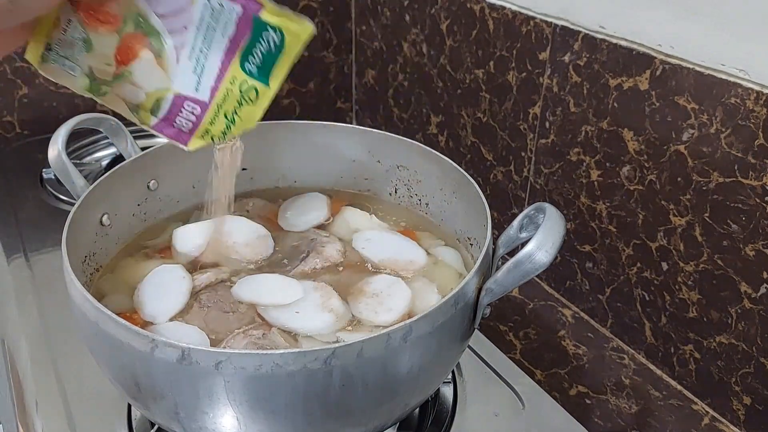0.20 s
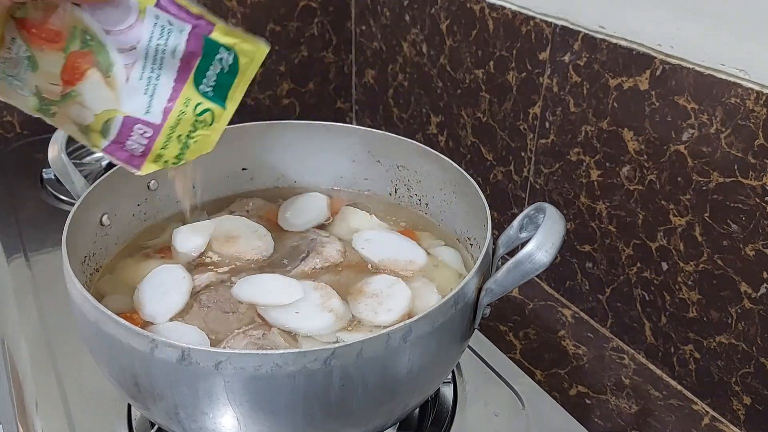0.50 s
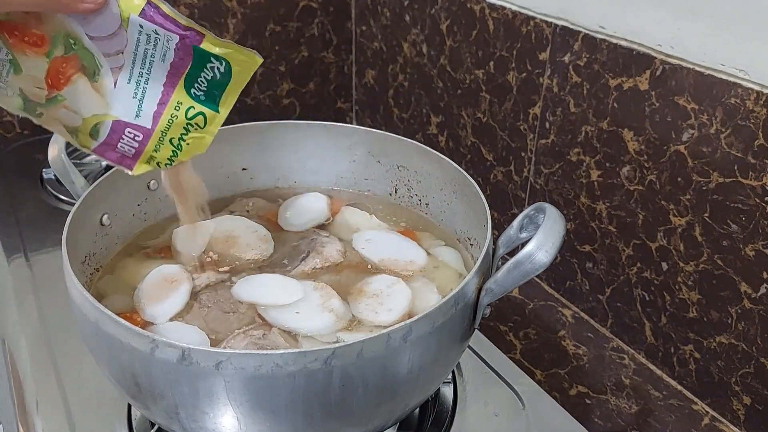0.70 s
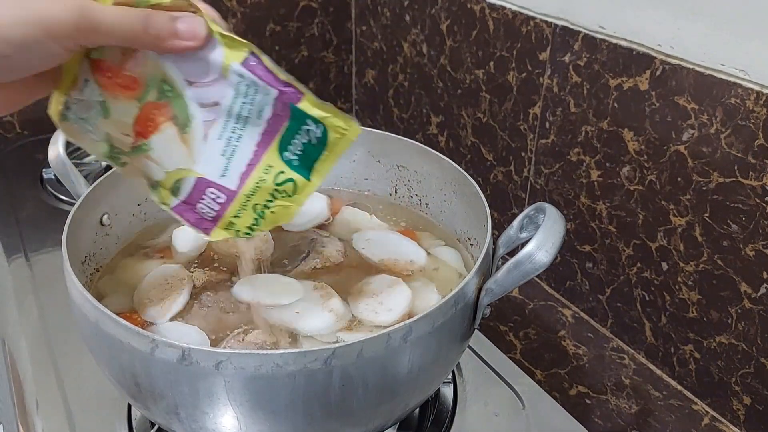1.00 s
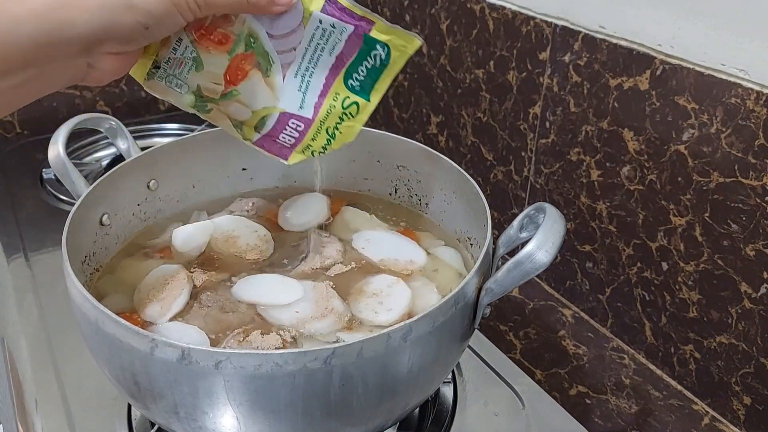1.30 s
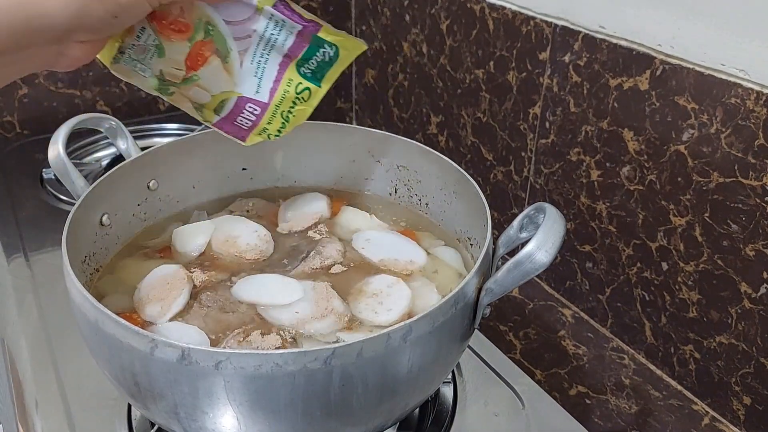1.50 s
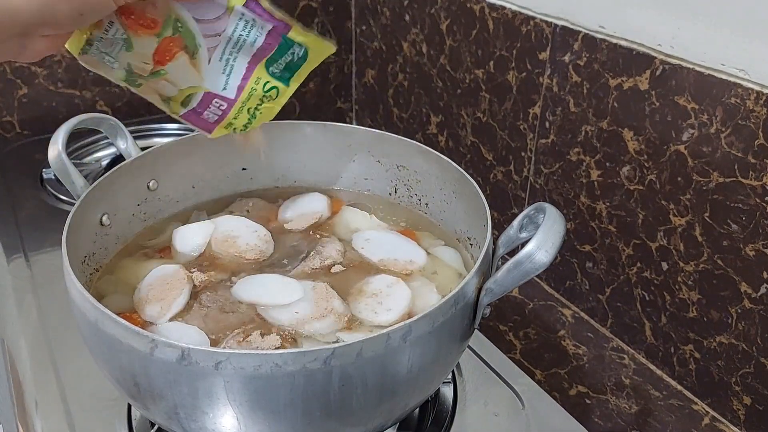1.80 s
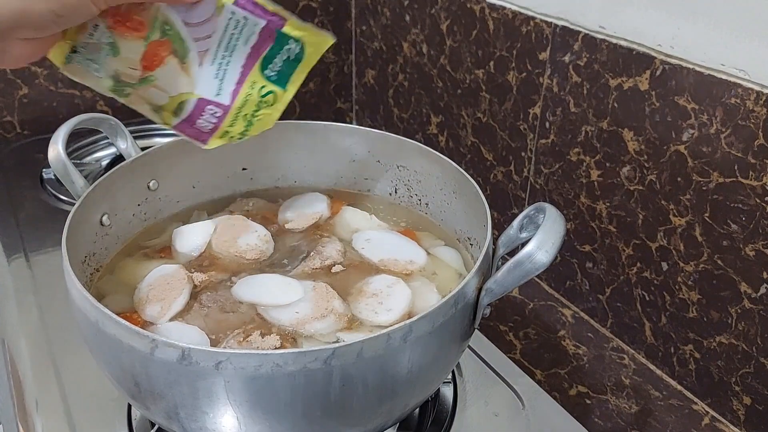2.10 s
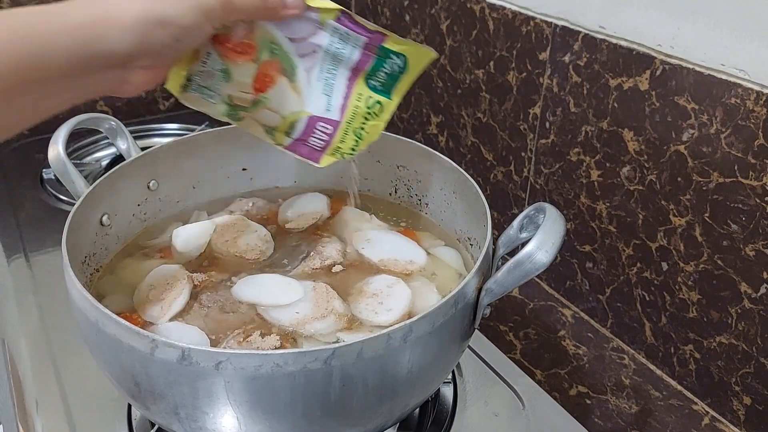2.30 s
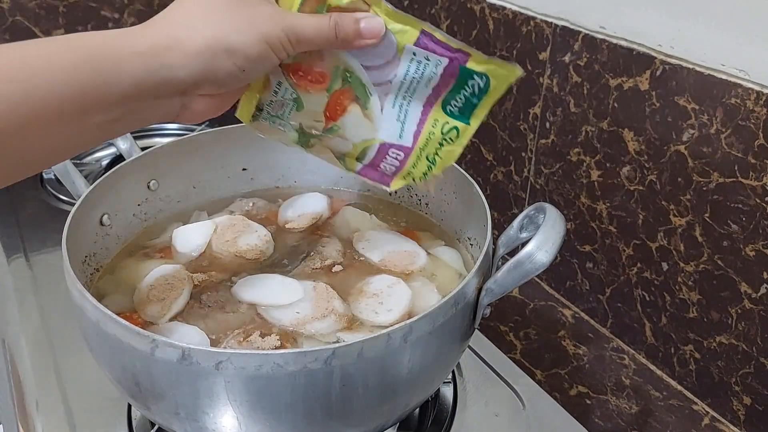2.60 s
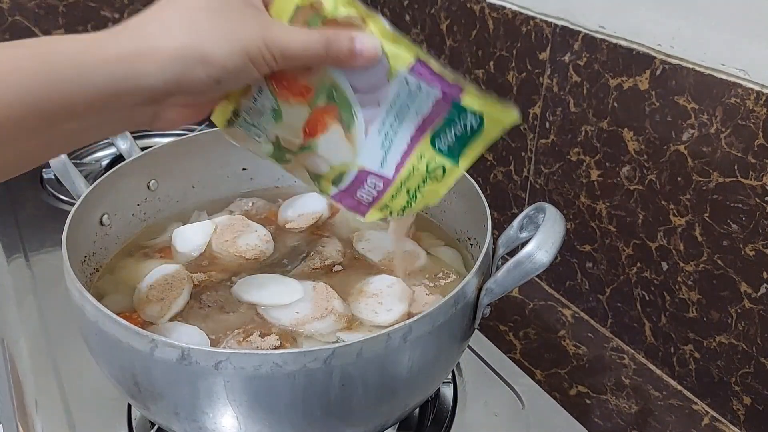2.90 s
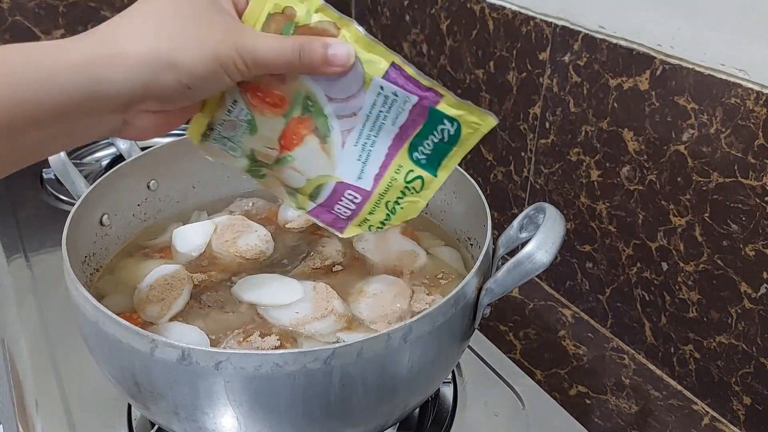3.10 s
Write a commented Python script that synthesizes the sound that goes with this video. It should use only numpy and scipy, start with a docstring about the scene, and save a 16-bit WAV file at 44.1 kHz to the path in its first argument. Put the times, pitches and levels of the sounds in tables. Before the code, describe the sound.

Crisp foil pouch shaken repeatedly, with sharp crackly clicks and powdery hiss, close in a quiet tiled room

```python
"""In a small tiled kitchen, a foil sachet of seasoning powder is shaken over a pot.
Each shake is a swell of random crinkles and powder hiss; creases snap over as a click with a bright chatter.
Now and then the hollow pouch booms on an unsteady low sine, or powder slumps as noise through low resonances.
All but the booms get quick echoes and a short noise tail; faint hiss and a low hum fill the still room."""
import sys
import numpy as np
from scipy import signal
from scipy.fft import rfft, irfft
from scipy.io import wavfile
from scipy.ndimage import uniform_filter1d

SR = 44100
rng = np.random.default_rng(int(sys.argv[2]) if len(sys.argv) > 2 else 0)


def put_to_file(sound):
    """Save the sound as 16-bit audio at rate SR, in the file named by the first command-line argument."""
    columns = np.atleast_2d(sound).T  # one column per channel
    safe = np.clip(columns, -1, 1)
    whole_steps = np.round(safe * 32767)
    wavfile.write(sys.argv[1], SR, whole_steps.astype(np.int16))


N = 141120  # samples in the scene
SIZE = 16384  # samples in one event, filter or echo path

AIR_DB, HUM_DB, HUM_RIGHT_DB = -71.5, -70.5, -13  # the last is the hum on the right relative to the left
HUM_HZ, HUM_WIDTH_HZ = 123.7, 23

# Echoes and tail are set against the direct sound; the three are then scaled down together.
NEAR_WALL_DB, RUSTLE_ROOM_DB, SNAP_ROOM_DB, SLUMP_ROOM_DB = 2.5, 6.5, -2, -4.5
NEAR_WALL_S, TAIL_BUILD_S, PATH_CHANGE_S = 0.0034, 0.002, 0.005

SLUMP_RISE_S, SLUMP_FALL_S = 0.0037, 0.019

LEAD_S = 0.1  # time kept ahead of a crest for its rise
BOOM_RISE_S, BOOM_FALL_S = 0.018, 0.047
BOOM_WAVER = 0.038  # rms pitch wander as a fraction of the pitch
BOOM_DB, BOOM_RIGHT_DB = 2.5, -4  # gain of all booms, right relative to left

BODY_HZ, TOP_HZ = 1770, 8400  # edges of the foil's low and high shelves
FOLD_RIPPLE_DB = 1.72  # rms

SNAP_DB, USUAL_BODY_DB = 12, -17.5  # gain of all snaps, body level that leaves the snap curve as it is
CHATTER_SHARE = 1.36  # chatter amplitude against a click of 1
RING_DB, RING_WIDTH_HZ = 8, 490

GRAINS_PER_S, GRAIN_SPREAD_DB = 2200, 4.5
POWDER_SHARE = 0.41  # part of the power that is powder hiss
CLUMP_DB, RUSTLE_DB = 2.06, 1.5  # rms depth of the clumping, gain of all shakes
SWISH_DB, SWISH_WIDTH_HZ = 2.5, 830

EDGE_HZ = 16000


def amp(db):
    """Decibels to gain."""
    return 10 ** (np.asarray(db) / 20)


def evened(x):
    """Scales to rms 1."""
    return x / np.sqrt(np.mean(x ** 2) + 1e-20)


def unit(x):
    """Scales each channel to energy 1."""
    return x / np.sqrt(np.sum(x ** 2, -1, keepdims=True) + 1e-20)


def read(points, hz):
    """Reads a table on a log-frequency axis."""
    f, value = np.transpose(points)
    return np.interp(np.log(hz + 1), np.log(f + 1), value)


def swell(t, rise, fall):
    """Bell-shaped rise to a crest at t = 0, then an exponential fall."""
    return np.exp(np.where(t < 0, -0.5 * (t / rise) ** 2, -abs(t) / fall))


def coloured(x, gain_db):
    """Minimum-phase filter with the given gain in each frequency bin, so nothing sounds early."""
    cepstrum = irfft(gain_db * np.log(10) / 20)
    # Folding the cepstrum onto positive times makes the filter causal.
    cepstrum[1:SIZE // 2] *= 2
    cepstrum[SIZE // 2 + 1:] = 0
    return irfft(rfft(x) * np.exp(rfft(cepstrum)))


def add(mix, s, sound):
    """Mixes a stereo sound in at time s."""
    at = round(s * SR)
    sound = sound[:, max(-at, 0):]
    part = mix[:, max(at, 0):][:, :sound.shape[1]]
    part += sound[:, :part.shape[1]]


def played(source, rows):
    """One stereo track from a table of events."""
    mix = np.zeros((2, N))
    for row in rows:
        add(mix, *source(*row))
    return mix


def placed(s, sound):
    """Delays the right side, as the sound reaches the left microphone first."""
    # Position of the pouch. Each row: time in seconds, lead of the left side in seconds.
    left_lead = [(0, .00023), (1.2, .00015), (3.2, .00008)]
    lag = round(np.interp(s, *np.transpose(left_lead)) * SR)
    return s, np.array([sound, np.pad(sound, (lag, 0))[:SIZE]])


def still_room():
    """Faint stereo hiss, and a low hum of narrow-band noise that wavers by itself."""
    # Tone of the hiss. Each row: frequency in Hz, relative gain in dB.
    air_tone = [(15, -50), (25, -31), (38, -9.5), (92, -8.5), (120, -27.5), (223, -12), (270, -9),
                (439, -25.5), (3620, -32.5), (10700, -26), (16000, -28)]
    hz = np.fft.rfftfreq(N, 1 / SR)
    left, right, low = rfft(rng.standard_normal((3, N)))
    air = evened(irfft(np.array([left, right]) * amp(read(air_tone, hz)), N))
    hum = evened(irfft(low / (1 + ((hz - HUM_HZ) / HUM_WIDTH_HZ) ** 2), N))
    return amp(AIR_DB) * air + amp(HUM_DB) * hum * amp([[0], [HUM_RIGHT_DB]])


def kitchen(x, room_db, count=8):
    """Direct sound, quick echoes off pot and tiles, and a diffuse tail; paths keep changing as the foil moves."""
    # Reverberation of the hard room. Each row: frequency in Hz, time to fall by 60 dB in seconds.
    decay = [(100, 0.28), (250, 0.34), (700, 0.27), (1800, 0.28), (5000, 0.26), (12000, 0.21),
             (16000, 0.26)]
    # Stereo lean. Each row: frequency in Hz, gain of left over right in dB.
    lean_curve = [(60, 7), (250, 9.5), (450, 2.5), (750, -1), (1500, 2), (3300, -0.5), (5500, -2),
                  (9000, -1), (15000, 0)]
    t, out = np.arange(SIZE) / SR, x.copy()
    turn = np.arange(N) / SR / PATH_CHANGE_S
    for k in range(count):
        near, late = rng.standard_normal((2, 2, SIZE))
        # Sparse echoes, none in the first 20 samples.
        sparse = rng.random((2, SIZE)) < 0.2
        near = unit(near * sparse * np.exp(-t / NEAR_WALL_S) * (np.arange(SIZE) > 20))
        # The tail is noise that dies at its own rate in each band.
        hz, when, bands = signal.stft(late, SR, nperseg=256)
        bands = bands * amp(-60 * when / read(decay, hz)[:, None])
        late = signal.istft(bands, SR, nperseg=256)[1][:, :SIZE]
        tail = unit(late * (1 - np.exp(-t / TAIL_BUILD_S)))
        paths = amp(NEAR_WALL_DB) * near + amp(room_db) * tail
        # The sets of paths crossfade in turn, each fading in and out over two steps.
        share = np.sin(np.pi / 2 * np.minimum((turn - k) % count, 2))
        out += signal.oaconvolve((x[0] * share)[None], paths, axes=1)[:, :N]
    lean = read(lean_curve, np.fft.rfftfreq(N, 1 / SR)) / 2
    leaning = irfft(rfft(out) * amp([lean, -lean]), N)
    return leaning / np.sqrt(1 + amp(NEAR_WALL_DB) ** 2 + amp(room_db) ** 2)


def slump(start, level_db):
    """Powder slumps against the pouch wall: a soft, dull push of noise through low resonances."""
    # Low resonances of pouch and pot. Each row: frequency in Hz, half-width in Hz, relative gain in dB.
    hollow = [(370, 32, -2.5), (555, 26, 2), (640, 54, -8), (774, 45, -5), (846, 45, -4)]
    t, hz = np.arange(SIZE) / SR, np.fft.rfftfreq(SIZE, 1 / SR)
    shape = sum(amp(db) / (1 + ((hz - f) / width) ** 2) for f, width, db in hollow)
    body = evened(irfft(rfft(rng.standard_normal(SIZE)) * shape))
    push = (1 - np.exp(-t / SLUMP_RISE_S)) * np.exp(-t / SLUMP_FALL_S)
    return placed(start, amp(level_db) * body * push)


def boom(crest, level_db, pitch_hz):
    """The air in the open pouch sounds one short, unsteady low note."""
    t = np.arange(SIZE) / SR - LEAD_S
    waver = evened(uniform_filter1d(rng.standard_normal(SIZE), size=400))
    phase = 2 * np.pi * np.cumsum(pitch_hz * (1 + BOOM_WAVER * waver)) / SR
    tone = swell(t, BOOM_RISE_S, BOOM_FALL_S) * np.sin(phase)
    return crest - LEAD_S, amp(level_db + BOOM_DB) * tone * amp([[0], [BOOM_RIGHT_DB]])


def foil(points, body_db, top_db, ring_hz, ring_width_hz, ring_db):
    """Colour of the foil in one pose: base curve, two shelves, one ringing facet and the ripple of its folds."""
    hz = np.fft.rfftfreq(SIZE, 1 / SR)
    rough = rng.standard_normal(len(hz))
    ripple = evened(uniform_filter1d(uniform_filter1d(rough, size=170), size=90))
    body = 1 / (1 + (hz / BODY_HZ) ** 4)
    top = 1 - 1 / (1 + (hz / TOP_HZ) ** 4)
    ring = 1 / (1 + ((hz - ring_hz) / ring_width_hz) ** 2)
    shelves = body_db * body + top_db * top
    return read(points, hz) + shelves + ring_db * ring + FOLD_RIPPLE_DB * ripple


def snap(start, level_db, body_db, ring_hz, chatter_s):
    """A crease flips with a click, chatters brightly for a moment and rings its own facet of foil."""
    # Base tone of a snap. Each row: frequency in Hz, gain in dB.
    crack_tone = [(30, -43), (150, -23), (250, -13.5), (500, -9), (900, 2), (1400, 0), (2200, 3.5),
                  (3200, 6), (4800, 5), (6000, 3.5), (7200, 4.5), (8600, 0), (10200, 4.5), (12000, 5.5),
                  (14000, -1), (16000, 0)]
    t = np.arange(SIZE) / SR
    # Differenced noise is bright; a little plain noise fills in below it.
    chatter = np.diff(rng.standard_normal(SIZE + 1)) + rng.standard_normal(SIZE) * 0.5
    click = CHATTER_SHARE * unit(chatter * np.exp(-t / chatter_s))
    click[0] = 1
    colour = foil(crack_tone, body_db - USUAL_BODY_DB, 0, ring_hz, RING_WIDTH_HZ, RING_DB)
    return placed(start, amp(level_db + SNAP_DB) * coloured(unit(click), colour))


def shake(crest, rise, fall, level_db, body_db, top_db, ring_hz):
    """A swarm of tiny crinkles over the hiss of sliding powder swells and dies."""
    # Base tone of the rustle. Each row: frequency in Hz, gain in dB.
    rustle_tone = [(30, -22), (120, -7.5), (175, -28), (250, -1), (400, -4.5), (560, -0.5), (720, 1),
                   (950, 3.5), (1250, 0.5), (2000, 5), (3300, 2.5), (4900, 5), (6000, 1), (7200, 4.5),
                   (8500, -2.5), (10000, 1.5), (11800, 6), (14000, 0), (16000, -6.5)]
    t = np.arange(SIZE) / SR - LEAD_S
    sizes = amp(GRAIN_SPREAD_DB * np.minimum(rng.exponential(1, SIZE), 4))
    sizes = sizes * rng.choice([-1, 1], SIZE)
    crinkles = evened(sizes * (rng.random(SIZE) < GRAINS_PER_S / SR))
    powder = rng.standard_normal(SIZE)
    drive = np.sqrt(1 - POWDER_SHARE) * crinkles + np.sqrt(POWDER_SHARE) * powder
    # Crinkles and hiss come in clumps a few milliseconds long.
    clumps = amp(CLUMP_DB * evened(uniform_filter1d(rng.standard_normal(SIZE), size=90)))
    rustle = evened(drive * clumps) * swell(t, rise, fall)
    colour = foil(rustle_tone, body_db, top_db, ring_hz, SWISH_WIDTH_HZ, SWISH_DB)
    return placed(crest - LEAD_S, amp(level_db + RUSTLE_DB) * coloured(rustle, colour))


def scene():
    """Shakes, snaps, booms and slumping powder over the quiet kitchen."""
    # Powder slumping against the pouch wall. Each row: start in seconds, level in dB before the envelope.
    slump_rows = [(0.451, -51.5), (.968, -53.5), (1.378, -44.5), (1.421, -56), (1.615, -55.5), (1.75, -51),
                  (1.785, -47), (1.818, -51), (2.616, -47)]
    # Booms of the hollow pouch. Each row: crest in seconds, level in dB before BOOM_DB, mean pitch in Hz.
    boom_rows = [(0.463, -49, 245.7), (.50, -55.5, 243.7), (.95, -58, 244), (0.991, -58.5, 241),
                 (1.43, -58.5, 246), (1.616, -54, 240.4), (1.79, -60, 248.7), (1.977, -58, 242.3),
                 (2.018, -58.5, 246.8), (2.168, -56.5, 263), (2.203, -52, 251.2)]
    # Creases snapping over. Each row: start in seconds, level in dB before SNAP_DB and the foil's colour,
    # body in dB against USUAL_BODY_DB, ring in Hz, chatter decay in seconds.
    snap_rows = [(0.2249, -36.5, -5.5, 7460, 0.0013), (0.241, -31, -24, 7110, 0.0013),
                 (0.4509, -28, -7.5, 4290, 0.00087), (0.4624, -33, -1, 4690, 0.0013),
                 (0.6066, -29, -23, 4550, 0.0011), (0.6828, -26.5, -7, 11700, 0.0011),
                 (0.8708, -42, -20.5, 5175, 0.0013), (0.9169, -28.5, -5, 4600, 0.0021),
                 (0.9782, -20, -14, 5000, 0.0013), (1.1136, -24, -15, 11500, 0.0013),
                 (1.2284, -22, -8.5, 7800, 0.00095), (1.3298, -41, -15, 6010, 0.0013),
                 (1.38, -20, -15.5, 6900, 0.001), (1.4157, -21.5, -24, 11430, 0.0013),
                 (1.4855, -35.5, -5.5, 4550, 0.0013), (1.5525, -30.5, -15, 4470, 0.0016),
                 (1.6147, -24.5, -18, 5100, 0.0015), (1.7503, -50, -10, 4940, 0.0013),
                 (1.8145, -23.5, -19, 11100, 0.0019), (1.9543, -30, -13, 5020, 0.0014),
                 (2.1557, -35.5, -19, 4740, 0.00096), (2.1872, -32.5, -44, 11600, 0.0013),
                 (2.203, -29, -6, 4440, 0.0018), (2.2393, -18, -5, 6740, 0.0011),
                 (2.5765, -32, -20, 4920, 0.0016), (2.6145, -22, -15, 12800, 0.0017),
                 (2.7897, -38, -21, 12700, 0.0013), (2.7924, -33, -16, 9400, 0.0011),
                 (2.8416, -17.5, -12, 7800, 0.0016), (3.145, -47, -11, 5410, 0.0013)]
    # Shakes and smaller flexes of the pouch. Each row: crest in seconds, rise in seconds, fall in seconds,
    # level in dB before RUSTLE_DB and the foil's colour, body shelf in dB, top shelf in dB, ring in Hz.
    shake_rows = [(0.157, 0.016, 0.028, -62.5, -0.5, 4.5, 4280),
                  (0.235, 0.013, 0.024, -41.5, -1.5, -6.5, 7150), (0.429, .012, 0.037, -42, -3, -11, 4100),
                  (.488, 0.016, 0.021, -41.5, 3.5, 4, 10400), (.595, .009, 0.012, -49.5, 5, 1, 5000),
                  (.628, 0.019, 0.05, -41, 1.5, 2, 3100), (.752, 0.025, .03, -66, 5, -5, 5000),
                  (0.889, 0.019, 0.014, -57.5, 6, -4, 5000), (0.953, 0.019, .02, -40.5, 3.5, -0.5, 4570),
                  (.982, 0.0028, 0.0072, -38, 9, 1, 4800), (1.056, 0.015, 0.032, -56.5, 9.5, -12, 5000),
                  (1.134, 0.013, 0.015, -36, -0.5, 3, 10000), (1.238, .01, 0.013, -44, -0.5, 2, 10000),
                  (1.349, .018, 0.029, -47, 4, -5, 4570), (1.386, 0.014, 0.01, -42.5, 8, -15, 7000),
                  (1.429, 0.02, .022, -47, 5.5, -20, 4000), (1.499, 0.017, 0.006, -45.5, -2.5, -14, 4560),
                  (1.585, .018, 0.013, -36.5, -2, 0, 4730), (1.623, 0.0094, 0.0058, -41.5, 5.5, 6.5, 5100),
                  (1.786, 0.021, 0.029, -39.5, 1.5, -1.5, 4440), (1.819, 0.0032, 0.011, -45.5, 3, -5, 4500),
                  (1.986, 0.019, 0.019, -35, -4.5, 0, 6800), (2.078, 0.016, 0.022, -59, 3.5, 5, 7000),
                  (2.198, 0.022, 0.0097, -40.5, 5.5, -0.5, 4760), (2.255, 0.029, 0.018, -46.5, 2, -6, 5000),
                  (2.35, 0.01, 0.02, -49, -0.5, -3, 5000), (2.394, .014, 0.021, -34.5, 0, 5.5, 6850),
                  (2.595, 0.015, 0.02, -48, 6.5, -8.5, 4900), (2.623, 0.012, 0.0047, -36.5, 2.5, 2, 4930),
                  (2.772, 0.017, 0.03, -54, 2, -6.5, 7500), (2.807, 0.019, 0.011, -60, 11.5, 0, 1700),
                  (2.858, 0.017, 0.01, -40, -1, 2, 12100), (2.89, 0.014, 0.013, -46, -1.5, -1, 12000),
                  (2.995, 0.036, 0.13, -61.5, -4, 0, 4700), (3.092, 0.0082, 0.019, -56, 2.5, 0.5, 11000),
                  (3.159, 0.023, 0.02, -57.5, 3, 0, 4500)]
    slumps = kitchen(played(slump, slump_rows), SLUMP_ROOM_DB, count=2)
    booms = played(boom, boom_rows)
    ticks = kitchen(played(snap, snap_rows), SNAP_ROOM_DB)
    rustle = kitchen(played(shake, shake_rows), RUSTLE_ROOM_DB)
    return still_room() + slumps + booms + ticks + rustle


def record(dry):
    """The recorder's band limit: a steep low-pass."""
    low_pass = signal.firwin(401, EDGE_HZ, window=("kaiser", 8), fs=SR)
    return signal.oaconvolve(dry, low_pass[None], "same")


dry = scene()
out = record(dry)
put_to_file(out)
```